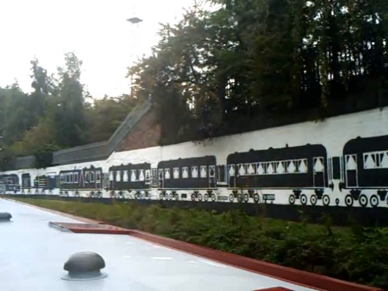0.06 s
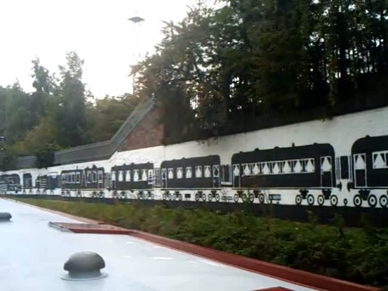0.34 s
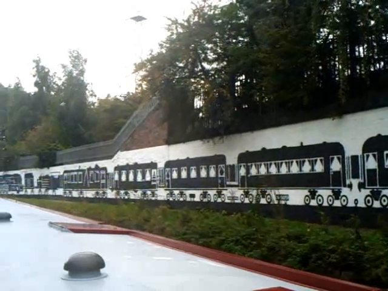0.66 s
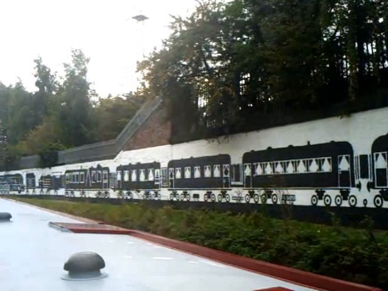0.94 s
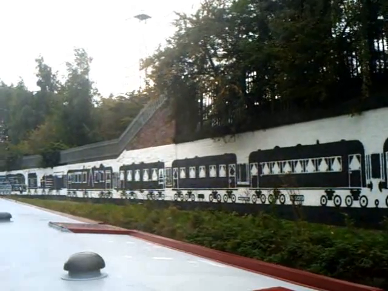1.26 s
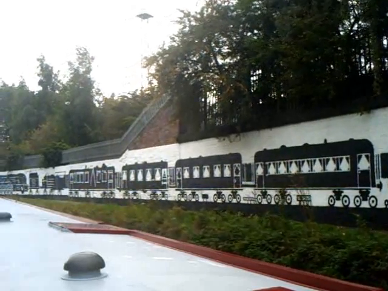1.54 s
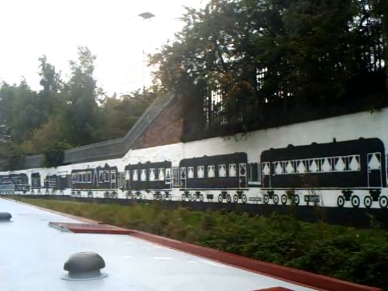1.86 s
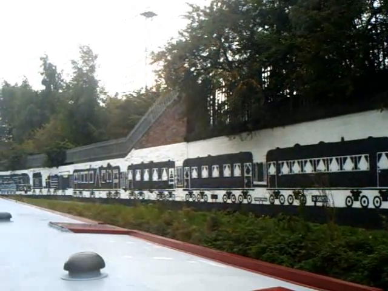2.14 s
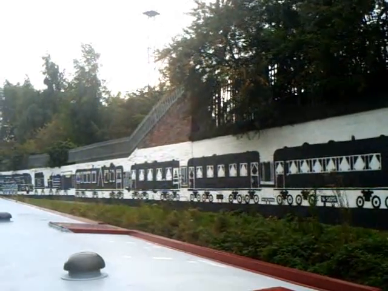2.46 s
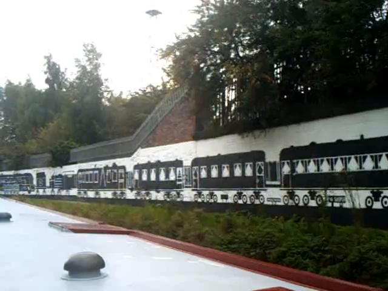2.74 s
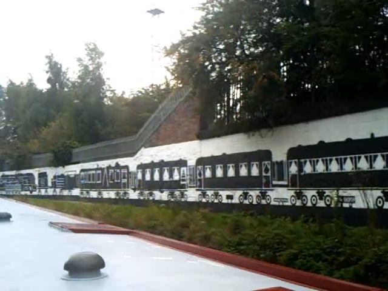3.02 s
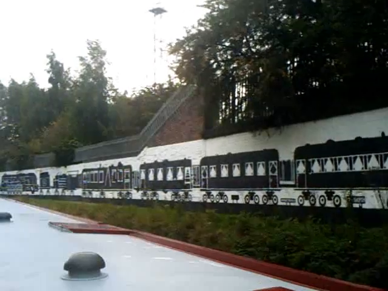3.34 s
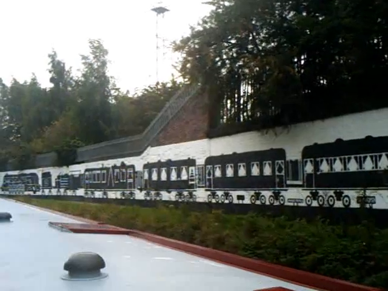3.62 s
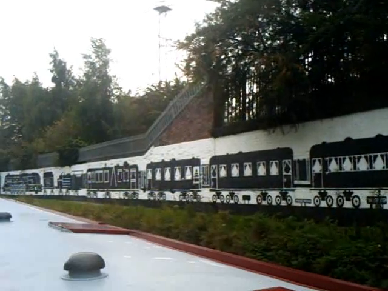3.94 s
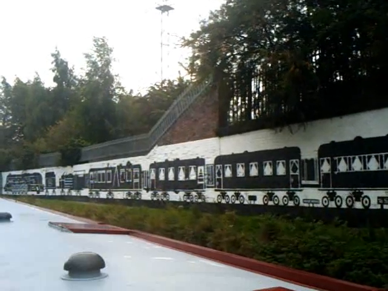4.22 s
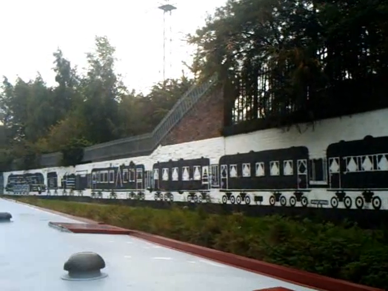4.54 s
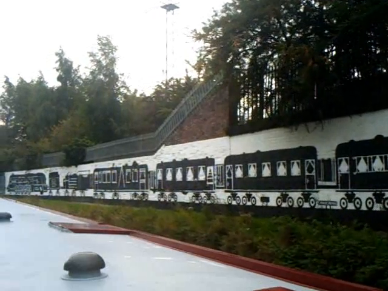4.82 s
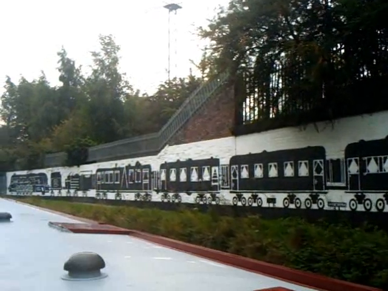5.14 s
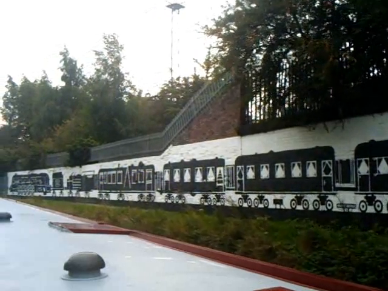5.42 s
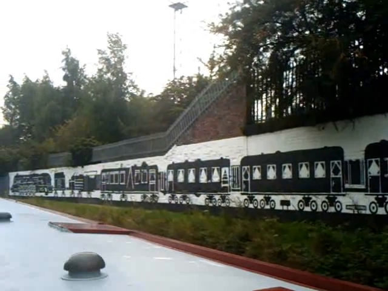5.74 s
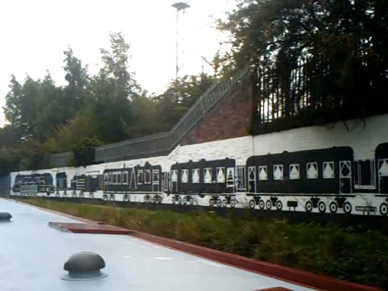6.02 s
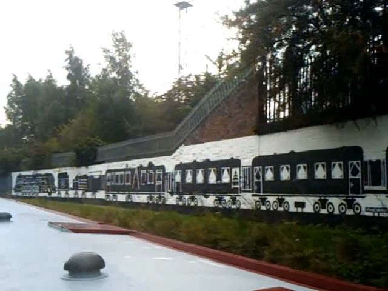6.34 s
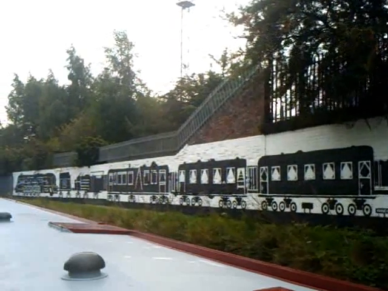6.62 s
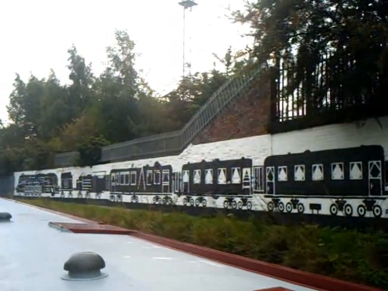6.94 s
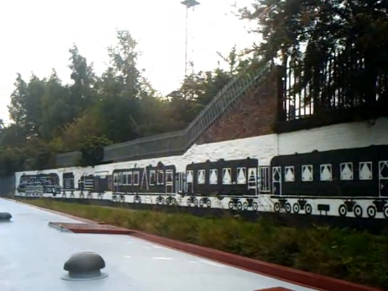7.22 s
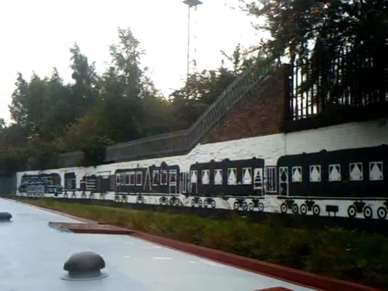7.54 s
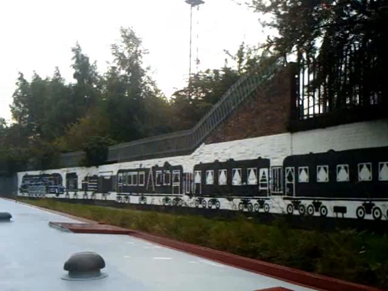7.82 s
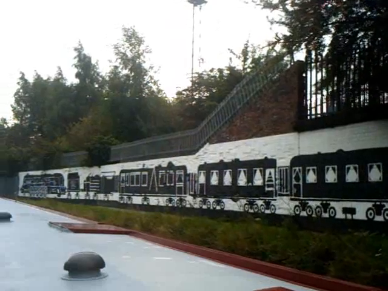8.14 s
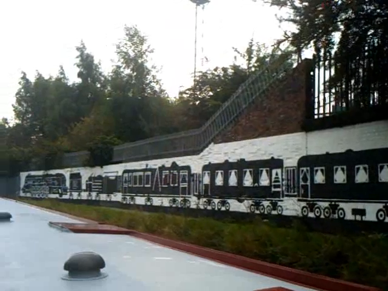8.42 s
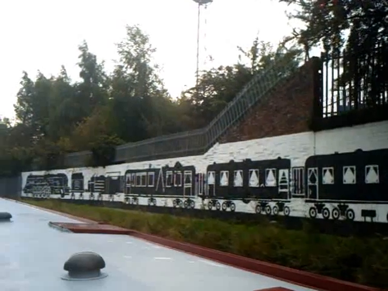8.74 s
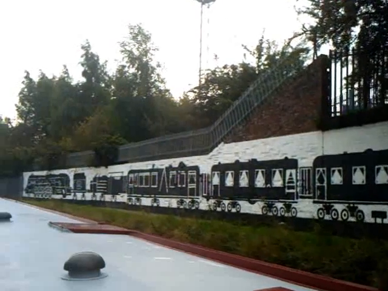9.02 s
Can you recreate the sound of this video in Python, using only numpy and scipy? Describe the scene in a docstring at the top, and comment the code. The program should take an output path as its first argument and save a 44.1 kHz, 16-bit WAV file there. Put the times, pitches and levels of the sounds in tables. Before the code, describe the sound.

A canal boat's inboard diesel engine runs at a constant, easy speed, heard from the stern deck. Its exhaust makes a deep, even drone, and the steel hull hums along with it. A quieter, rapid metallic clatter and a faint whine come from under the deck. Low wind rumble and a soft hiss lie behind. The sound carries on almost unchanged throughout.

```python
"""Narrowboat diesel from the stern deck

A four-cylinder, four-stroke diesel plods along a canal at about 1230 rpm. Its sounds are periodic in
the crank's rotation: the exhaust drones at the firing rate and the steel hull hums at harmonics of
the engine cycle. Valve gear and injectors clatter under the deck, and belt-driven parts hum and
whine. A low wind rumble, a faint hiss and a thin whistle lie behind."""
import sys
import numpy as np
from scipy import signal
from scipy.fft import rfft, irfft
from scipy.io import wavfile
from scipy.ndimage import uniform_filter1d

SR = 44100
rng = np.random.default_rng(int(sys.argv[2]) if len(sys.argv) > 2 else 0)


def log_audio(samples):
    """Write samples as a 16-bit WAV file to the path given in sys.argv[1]."""
    # one column per channel
    frames = np.atleast_2d(samples).T
    # limit to full scale, then quantise
    limited = np.clip(frames, -1, 1)
    pcm = np.round(limited * 32767).astype(np.int16)
    wavfile.write(sys.argv[1], SR, pcm)


N = 404822
TIME = np.arange(N) / SR


def undb(db):
    """Decibels to amplitude ratio."""
    return 10 ** (np.asarray(db) / 20)


def unit(x):
    """Normalisation to rms 1."""
    return x / np.sqrt(np.mean(x ** 2))


def curve(table):
    """Linear interpolation of (seconds, value) rows at every sample."""
    return np.interp(TIME, *np.transpose(table))


def walk(rate_hz):
    """Slow random modulation of rms 1: sample-and-hold noise, smoothed twice."""
    hold = int(SR / rate_hz)
    held = np.repeat(rng.standard_normal(N // hold + 1), hold)[:N]
    return unit(uniform_filter1d(uniform_filter1d(held, hold), hold))


def tone(turns):
    """A sinusoid of rms 1, its phase given in turns."""
    return np.sqrt(2) * np.cos(2 * np.pi * turns)


def colour(x, outline, size=8192):
    """Minimum-phase filtering by a (Hz, dB) outline; the result has rms 1."""
    hz, db = np.transpose(outline)
    grid = np.maximum(np.arange(size // 2 + 1) * SR / size, 1)
    gain = undb(np.interp(np.log(grid), np.log(hz), db))
    cepstrum = irfft(np.log(gain))
    cepstrum[1:size // 2] *= 2
    cepstrum[size // 2 + 1:] = 0
    response = irfft(np.exp(rfft(cepstrum)))
    return unit(signal.fftconvolve(np.r_[x[-size:], x], response)[size:size + N])


def contact(cycle, repeat):
    """Contact noise of rough metal: the share `repeat` of its power recurs every engine cycle."""
    period = int(N / cycle[-1])
    recurring = rng.standard_normal(SR)[(cycle % 1 * period).astype(int)]
    return np.sqrt(repeat) * recurring + np.sqrt(1 - repeat) * rng.standard_normal(N)


def knocks(cycle, table, decay_s, scatter_db, jitter_s, floor_db):
    """Envelope of damped impacts at set crank angles, scattered in time and strength, over a floor."""
    position, db = np.transpose(table)
    due = np.arange(np.ceil(cycle[-1]))[:, None] + position
    late, strong = rng.standard_normal((2,) + due.shape)
    onset = (np.interp(due, cycle, np.arange(N), right=2 * N) + late * jitter_s * SR).astype(int)
    heard = (onset >= 0) & (onset < N)
    energy = np.bincount(onset[heard], undb(db + scatter_db * strong)[heard] ** 2, N)
    power = signal.lfilter([1], [1, -np.exp(-2 / (decay_s * SR))], energy)
    return np.sqrt(power / power.mean() + undb(floor_db) ** 2)


# Exhaust spectrum. Each row: multiple of the firing rate, relative level in dB.
EXHAUST_HARMONICS = [(1, 0.76), (2, -24), (3, -37), (4, -19.5), (5, -33), (6, -24.5), (7, -21), (8, -23),
                     (12, -30), (13, -31.5)]
# The drone eases slightly. Each row: time in seconds, gain in dB.
EXHAUST_GAIN = [(0.0, -25.5), (3.83, -26), (9.18, -26.5)]


def exhaust(firing, unsteady=0.14, smear_turns=0.13, rise_db_per_s=0.27):
    """One puff per firing makes a harmonic series; the silencer weakens and delays the overtones."""
    drone = undb(EXHAUST_HARMONICS[0][1]) * tone(firing)
    overtone_gain = undb(-0.64 + rise_db_per_s * TIME)  # slowly grows throatier
    for multiple, db in EXHAUST_HARMONICS[1:]:
        lag = (multiple - 1) / 4 + smear_turns * rng.standard_normal()
        lag += unsteady * walk(9.8) / (2 * np.pi)
        amplitude = overtone_gain * undb(db) * (1 + unsteady * walk(8))
        drone += amplitude * tone(multiple * firing - lag)
    return undb(curve(EXHAUST_GAIN)) * drone


# Hum of the steelwork; the top rows, near 1.3 kHz, are the rocker cover's ring. Each row: multiple of the cycle
# rate, rms level in dB.
HULL_HARMONICS = [(2, -65), (3, -48), (5, -61.5), (6, -60), (7, -57), (13, -59.5), (14, -54.5), (15, -55.5),
                  (17, -70), (26, -58), (30, -54.5), (36, -57.5), (37, -63), (38, -56.5), (39, -70),
                  (42, -56), (44, -61), (46, -61), (56, -74), (58, -60.5), (124, -49), (126, -53.5),
                  (129, -53)]
# Wind rumble below 30 Hz, then the hull's boom. Each row: frequency in Hz, relative gain in dB.
WIND_AND_BOOM = [(8, 3.5), (18, 0.5), (45, -1), (100, -8), (150, 3), (190, -4.5), (240, -7.5), (305, -0.5),
                 (360, -8), (490, -7), (600, -8.5), (660, -17.5), (900, -39)]


def hull_and_wind(cycle, unsteady=0.18, boom_db=-44.5):
    """Forced vibration: unequal cylinders shake the steelwork and rocker cover, and pistons thud in it, over
    wind rumble."""
    hum = 0
    for multiple, db in HULL_HARMONICS:
        lag = rng.random() + unsteady * walk(4) / (2 * np.pi)
        amplitude = undb(db) * (1 + unsteady * walk(4.3))
        hum += amplitude * tone(multiple * cycle - lag)
    thuds = contact(cycle, repeat=0.13) * undb(2 * tone(8 * cycle))
    return hum + undb(boom_db) * colour(thuds, WIND_AND_BOOM)


# Valve knocks, then injector and piston ticks. Each row: fraction of the cycle, relative level in dB.
VALVE_IMPACTS = [(0.139, -5), (.21, -16), (0.327, -6), (0.491, -14), (0.568, -5.5), (0.643, -10),
                 (0.721, -7), (0.809, -5), (0.957, -4)]
INJECTOR_IMPACTS = [(0.138, 1.5), (.25, -5), (.32, -1), (.43, -9.5), (.5, 2.5), (.57, -8), (.67, -6),
                    (0.749, -2.5), (.94, -1.5)]
# Resonances of the rocker cover, then the block. Each row: frequency in Hz, relative gain in dB.
COVER_RESPONSE = [(450, -31), (660, -17), (790, -12.5), (860, -19.5), (1000, -9.5), (1120, -11.5),
                  (1210, -4.5), (1305, 1), (1430, -4.5), (1530, -14.5), (1660, -24), (1800, -20),
                  (2100, -46.5)]
BLOCK_RESPONSE = [(1600, -16.5), (1890, -14), (1970, 3.5), (2090, 4), (2330, -1.5), (2410, 1.5),
                  (2540, -5.5), (2880, 3), (3120, -4), (3290, 2.5), (3420, -2.5), (4050, -5.5),
                  (4750, -10.5), (5700, -29), (8000, -37.5)]


def clatter(cycle, valve_db=-40.5, wander_db=0.2, injector_db=-43.5):
    """Impacts excite resonances: tappets ring the rocker cover, injectors and pistons the block."""
    taps = contact(cycle, repeat=0.41)
    taps *= knocks(cycle, VALVE_IMPACTS, decay_s=0.02, scatter_db=1.5, jitter_s=0.00056, floor_db=-2)
    ticks = contact(cycle, repeat=0.099)
    ticks *= knocks(cycle, INJECTOR_IMPACTS, decay_s=0.0093, scatter_db=2.4, jitter_s=0.00037,
                    floor_db=7.5)  # the floor is the rush of the gears
    cover = undb(valve_db + wander_db * walk(5.5)) * colour(taps, COVER_RESPONSE)
    block = undb(injector_db) * colour(ticks, BLOCK_RESPONSE)
    return cover + block


# Two belt-drive tones with an engine harmonic between them.
# Each row: multiple of the cycle rate, relative level in dB.
BEATING_TONES = [(30.862, -58), (31, -54), (31.045, -48.5)]


def belt_and_engine_beats(cycle, in_phase_s=5.58, waver_turns=0.068, gain_db=1.2):
    """Beating: two belt tones and a nearby engine harmonic swell as they come into phase."""
    turned = cycle - np.interp(in_phase_s, TIME, cycle)
    waver = waver_turns * tone(2 * cycle)  # once per crank turn
    hum = sum(undb(db) * tone(multiple * turned + waver) for multiple, db in BEATING_TONES)
    return undb(gain_db) * hum


def alternator(cycle, level_db=-58, wander_db=3.5, ragged_turns=0.08):
    """A whine tied to shaft speed comes and goes under random amplitude and phase modulation."""
    swell = unit(undb(wander_db * walk(5.6)))
    return undb(level_db) * swell * tone(334.3 * cycle + ragged_turns * walk(22))


# Engine speed, held by the governor. Each row: time in seconds, firing rate in Hz.
FIRING_RATE = [(0.0, 41.22), (0.8, 41.02), (1.4, 41.17), (2.3, 40.9), (2.75, 41.09), (3.2, 40.75),
               (3.75, 40.71), (5.7, 40.93), (5.98, 41.11), (6.35, 40.84), (7.1, 41), (7.45, 40.93),
               (9.18, 41.12)]


def scene():
    """Phase locking: the engine's sounds follow the crankshaft, with four firings to a cycle."""
    firing = np.cumsum(curve(FIRING_RATE)) / SR
    cycle = firing / 4
    drone = exhaust(firing) + hull_and_wind(cycle) + belt_and_engine_beats(cycle)
    return (drone + alternator(cycle) + clatter(cycle))[None]


# A thin electronic whistle. Each row: frequency in Hz, rms level in dB.
WHISTLE_TONES = [(7690, -84), (7720, -74), (7749.5, -74.5), (7779, -84), (14888, -86), (15175, -88),
                 (15234, -88), (15352, -88), (15470, -76), (15529, -82)]
# Spectrum of the hiss. Each row: frequency in Hz, relative density in dB.
HISS_SPECTRUM = [(500, 0), (5500, 0), (7500, 1.3), (8200, -2.2), (10500, -2.7), (12000, -4.5),
                 (15700, -6.5)]


def record(dry, hiss_db=-61.2, cutoff_hz=15740):
    """Superposition and band limiting: whistle and hiss join the engine ahead of a steep low-pass."""
    whistle = sum(undb(db) * tone(hz * TIME + rng.random()) for hz, db in WHISTLE_TONES)
    hiss = undb(hiss_db) * colour(rng.standard_normal(N), HISS_SPECTRUM)
    low_pass = signal.ellip(18, .1, 70, cutoff_hz, fs=SR, output="sos")
    return signal.sosfilt(low_pass, dry + whistle + hiss)


dry = scene()
out = record(dry)
log_audio(out)
```